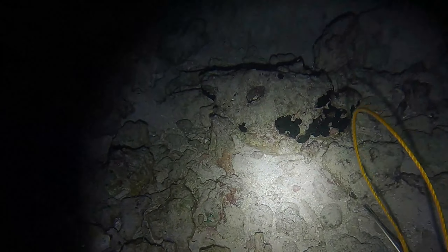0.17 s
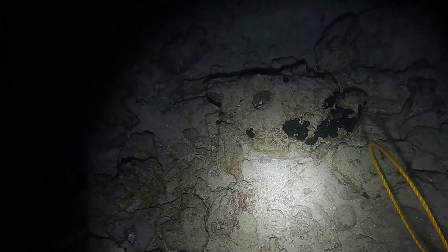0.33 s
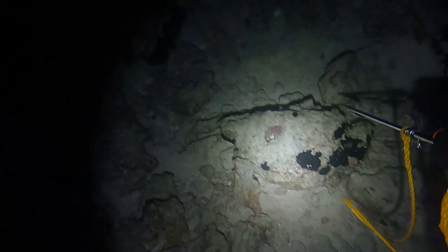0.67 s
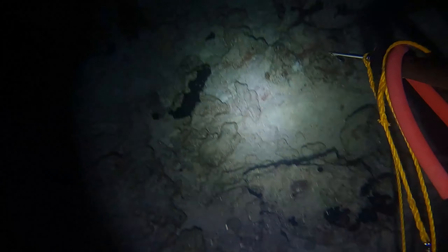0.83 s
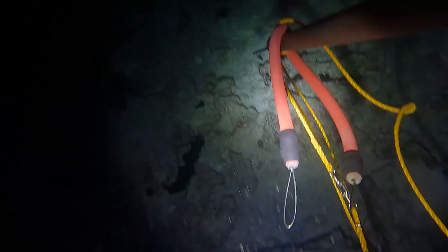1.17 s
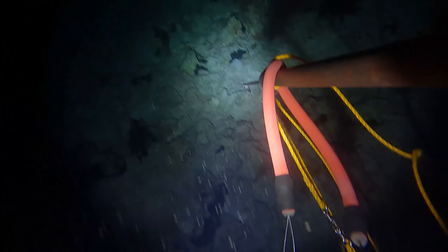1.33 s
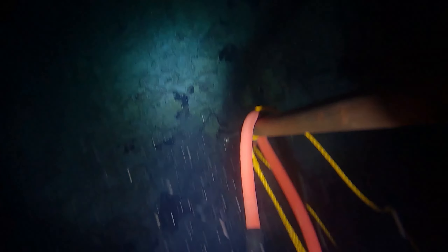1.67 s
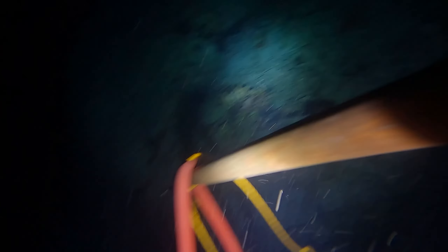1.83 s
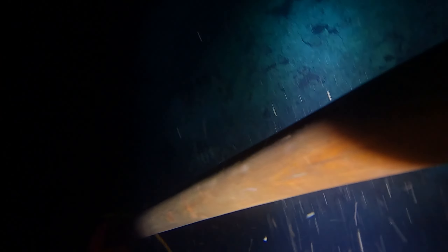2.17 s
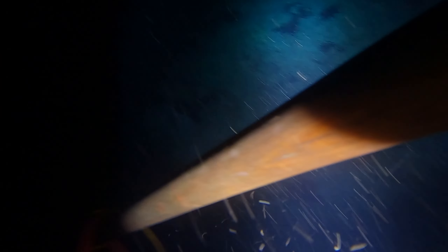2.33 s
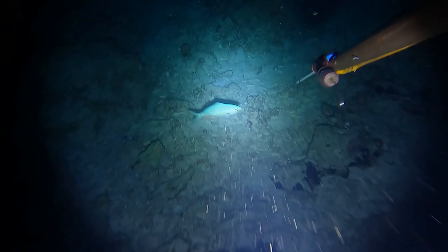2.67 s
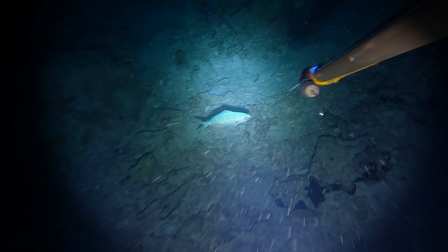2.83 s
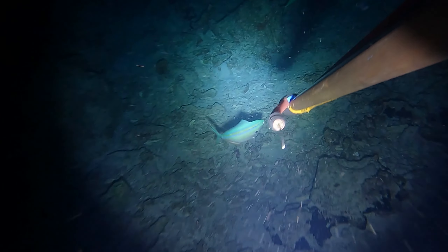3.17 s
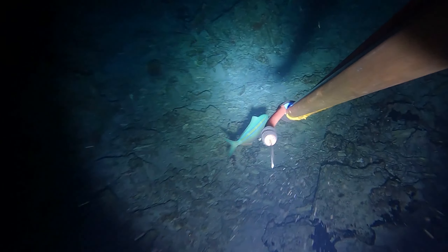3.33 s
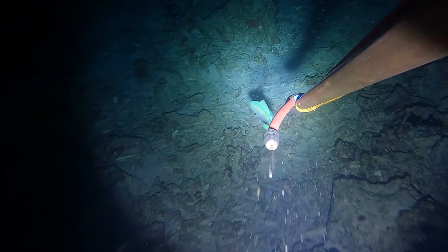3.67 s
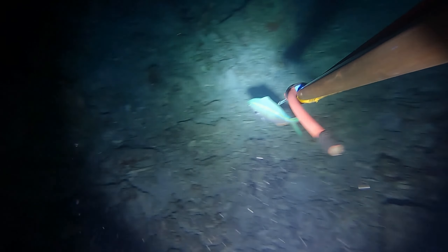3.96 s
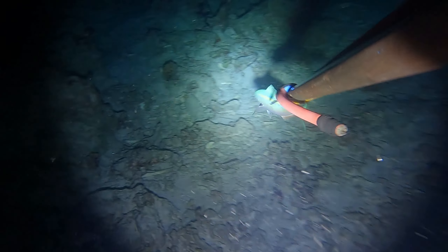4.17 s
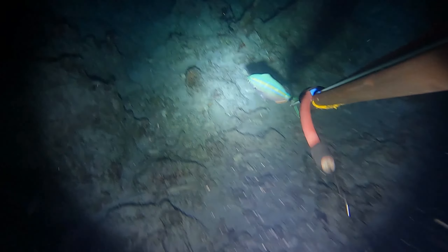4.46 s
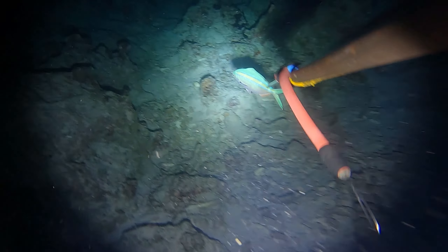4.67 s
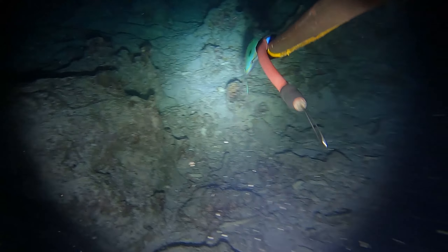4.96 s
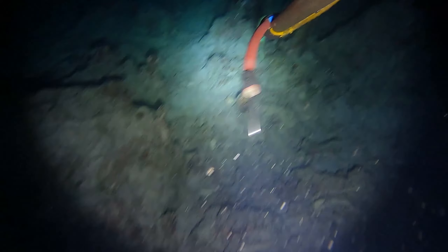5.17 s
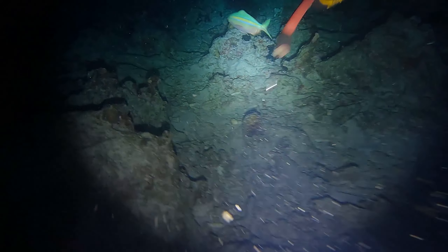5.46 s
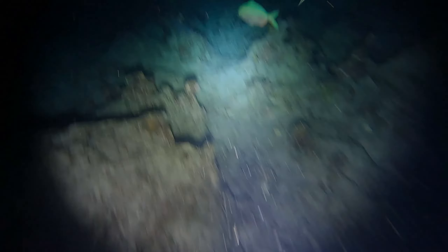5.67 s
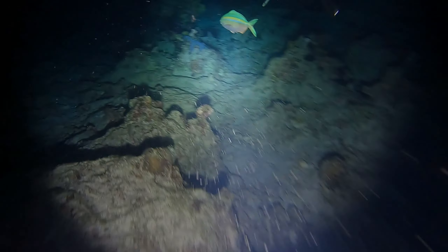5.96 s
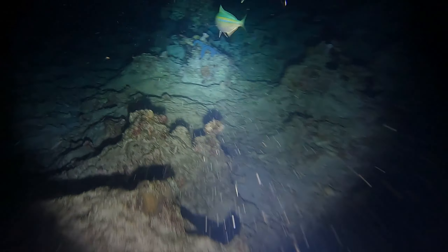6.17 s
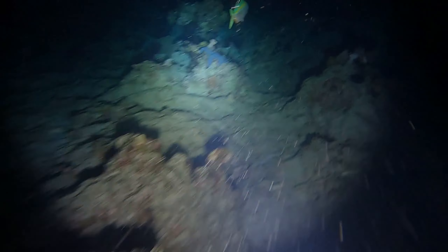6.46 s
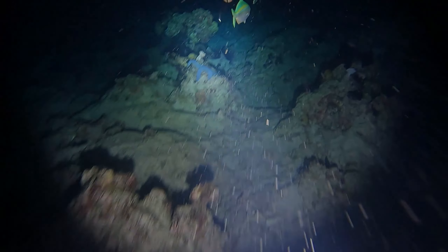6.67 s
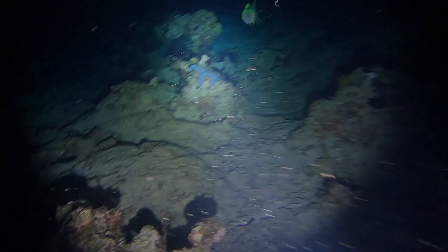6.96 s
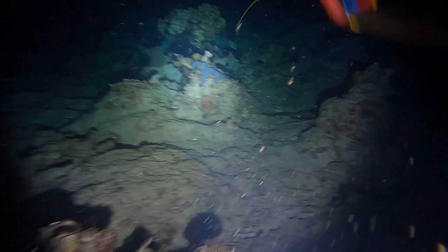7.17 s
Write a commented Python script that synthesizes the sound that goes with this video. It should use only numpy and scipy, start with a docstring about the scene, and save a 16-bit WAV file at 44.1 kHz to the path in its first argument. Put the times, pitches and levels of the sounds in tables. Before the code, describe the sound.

Underwater, water buffets a camera casing with low rumble and steady hollow humming. Sharp clicks crackle near and far. Line and hand scrape the casing, knocks ring its plastic and wet rubber chirps briefly. After a short cut to silence, a calmer, almost mono hum returns with streaming bubbles and snaps, opening out wider before a loud burst of scrapes and knocks.

```python
"""Night reef, two microphone ports in a spearfisher's camera housing under water: it hums as water streams
past, over filtered-noise hiss, with near and far shrimp snaps (clicks with scatter) and bubbles (short tones).
From 0.3 s speargun, line and hand scrape (stick-slip ticks), thump and knock (ringing modes) on the housing;
wet rubber squeaks (gliding tones) from 1.4 s. At 2.5 s the sound cuts out, then fades back in further along
the reef, nearly mono, with more bubbles; the image widens from 5.25 s, and hard handling comes at 7 s."""
import sys
import numpy as np
from scipy import signal
from scipy.fft import rfft, irfft
from scipy.io import wavfile
from scipy.ndimage import uniform_filter1d, map_coordinates

SR = 44100
rng = np.random.default_rng(int(sys.argv[2]) if len(sys.argv) > 2 else 0)


def dump_mix(stems):
    """Bounce the given channels to the path in sys.argv[1] as a 16-bit WAV at rate SR."""
    frames = np.atleast_2d(stems).T  # one column per channel
    limited = np.clip(frames, -1, 1)  # hard clip at full scale
    pcm = np.round(limited * 32767).astype(np.int16)
    wavfile.write(sys.argv[1], SR, pcm)


N = 321930
TIME = np.arange(N) / SR
TAPS = 4096  # length of the impulse responses, in samples
HZ = np.fft.rfftfreq(TAPS, 1 / SR)
FULL_HZ = np.fft.rfftfreq(N, 1 / SR)
# the sound cuts out, starts to fade back in, and is fully back
CUT_S, FADE_S, FULL_S = 2.492, 2.61, 2.77


def amp(db):
    """Decibels to gain."""
    return 10 ** (np.asarray(db) / 20)


def unit(x):
    """Scales to an rms of one."""
    return x / np.sqrt(np.mean(x ** 2) + 1e-20)


def read(points, hz=HZ):
    """Reads a table along a log-frequency axis."""
    f, value = np.transpose(points)
    return np.interp(np.log(hz + 1), np.log(f + 1), value)


def resonances(modes):
    """Gain of a set of steep-sided resonances; each width is taken at half the peak gain."""
    power = 0
    for hz, width_hz, db in modes:
        peak = amp(db) / (1 + ((HZ - hz) / (width_hz * 0.5)) ** 2)
        power = power + peak ** 2
    return np.sqrt(power)


def tilt(slope_db):
    """Gain that leans by so many dB an octave above 600 Hz and is level below."""
    return amp(slope_db * np.log2(np.maximum(HZ, 600) / 1000))


def favour(spot_hz, lift_db=5.5, octaves=0.19):
    """Gain that lifts the range round one favoured frequency."""
    return amp(lift_db * np.exp(-(np.log2((HZ + 1) / spot_hz) / octaves) ** 2))


def hardness(spot_hz, even_hz, slope_db=5.0):
    """The higher the range that a hit favours, the brighter it is, in dB an octave."""
    return slope_db * np.log2(spot_hz / even_hz)


def ring(gain):
    """Causal (minimum-phase) impulse response with the shape of this gain."""
    log_gain = np.log(np.maximum(gain / gain.max(), 1e-5))
    circle = np.concatenate([log_gain, log_gain[-2:0:-1]])
    return np.fft.ifft(np.exp(np.conj(signal.hilbert(circle)))).real


def add(mix, s, sound):
    """Mixes a sound in at time s."""
    part = mix[max(round(s * SR), 0):][:len(sound)]
    part += sound[:len(part)]


def wander(rate_hz, size=N):
    """Smooth random drift through rate_hz random knots a second."""
    knots = rng.standard_normal(N // 8)
    return map_coordinates(knots, [np.arange(size) * rate_hz / SR], order=2, mode="wrap")


# how far the water differs between the two ports: pitch_hz, side_over_middle_db
WATER_WIDTH = [(200, -34), (700, -10), (1500, -5), (4400, -0.5), (8000, -18), (14000, 7)]


def noise(gain):
    """Coloured noise from the water, shared by both ports to a degree that varies with pitch."""
    mid, apart = rfft(rng.standard_normal((2, N)))
    side = apart * amp(read(WATER_WIDTH, FULL_HZ))
    both = np.array([mid + side, mid - side])
    return unit(irfft(both * np.interp(FULL_HZ, HZ, gain), N))


# narrow resonances of the housing's pane: pitch_hz, width_hz, level_db over the direct sound
PANE_MODES = [(1564, 61, 6), (2502, 110, 5), (2752, 146, 10.5), (3370, 220, 4), (3744, 220, 6)]


def through_pane(points):
    """Gain of a sound from the water once the pane of the housing has coloured it."""
    return amp(read(points)) * np.hypot(1, resonances(PANE_MODES))


# strength of the flow round the housing as the diver swims: time_s, strength_db
FLOW_STRENGTH = [(0, -35), (0.65, -34), (1.15, -22), (2.3, -30), (2.9, -28.5), (3.6, -41), (5.7, -31.5),
                 (7.0, -35.5)]
# colour of the buffeting flow, then of the shaking mount: pitch_hz, density_db (per Hz)
BUFFET_COLOUR = [(8, -20.5), (22, -4.5), (90, -22.5), (600, -95.5)]
SHAKE_COLOUR = [(40, -29.5), (80, 6), (100, -5.5), (125, -16), (200, -30.5), (1500, -100)]
# hollow resonances of the housing: pitch_hz, width_hz, before_break_db, after_break_db
HUM_MODES = [(189, 830, -7.5, -11.5), (332, 121, -4, -4.5), (455, 90, -5, -1.5), (504.2, 49.5, 0, 2),
             (701.7, 86, 4, 2), (1130, 68, -14, -48)]
# colour of the hiss in the water before and after the break: pitch_hz, density_db (per Hz)
HISS_BEFORE = [(500, 8.5), (1100, 14), (2000, 3), (4400, -9), (5600, 7.5), (6300, -6.5), (7100, 7),
               (8300, -5.5), (10000, -9), (15500, -31)]
HISS_AFTER = [(1100, -4), (3000, 0), (4500, -5), (4900, 9), (5800, -7), (7200, -3.5), (10200, -11),
              (15500, -23)]


def water(still_s=4.82, still_length_s=0.5, still_db=-34, surge_db=7, settle_s=0.77):
    """Flow buffets the camera, shakes its mount and sets the hollow housing humming, over a thin hiss."""
    before = TIME < CUT_S
    flow_db = np.interp(TIME, *np.transpose(FLOW_STRENGTH))
    buffet = amp(flow_db + 3.0) * noise(amp(read(BUFFET_COLOUR)))

    # the mount shakes more in stronger flow, and holds still for one short spell
    still = np.exp(-((TIME - still_s) / (still_length_s / 2)) ** 4)
    shake_db = np.where(before, -24.5, -16) + 0.44 * flow_db + still_db * still
    shake = amp(shake_db + 2.56 * wander(14)) * noise(amp(read(SHAKE_COLOUR)))

    # the hum starts strong on either side of the break and settles
    elapsed = np.where(before, TIME, np.maximum(TIME - FULL_S, 0))
    hum_db = np.where(before, -41, -34) + surge_db * np.exp(-elapsed / settle_s)
    hum_before = noise(resonances([(hz, width, db) for hz, width, db, _ in HUM_MODES]))
    hum_after = noise(resonances([(hz, width, db) for hz, width, _, db in HUM_MODES]))
    hum = amp(hum_db + 1.66 * wander(25)) * np.where(before, hum_before, hum_after)

    # the hiss flutters, and eases towards the end
    hiss_before = amp(-49.5) * noise(through_pane(HISS_BEFORE))
    hiss_after = amp(-55) * noise(through_pane(HISS_AFTER))
    easing_db = -.9 * np.maximum(TIME - 4.3, 0)
    hiss = np.where(before, hiss_before, hiss_after) * amp(easing_db + 2 * wander(140))
    return buffet + shake + hum + hiss


# the nearest shrimp snaps: start_s, level_db (relative), favoured_hz
NEAR_SNAPS = [(0.036, -27, 2240), (0.078, -24, 5500), (0.119, -29.5, 8500), (0.238, -27, 1480),
              (0.923, -31, 2430), (1.1404, -29, 7450), (1.7384, -24, 3560), (2.961, -30.5, 3000),
              (3.818, -26.5, 1900), (4.241, -32, 2000), (4.4912, -33, 3350), (5.048, -30, 1900),
              (5.2418, -27.5, 2370), (6.427, -30.5, 4640), (6.479, -33.5, 3200), (7.212, -30, 4000)]
# colour of a snap: pitch_hz, density_db (per Hz)
SNAP_COLOUR = [(300, -31), (1100, 9), (7200, 0), (9000, -12.5), (15500, -26.5)]


def shrimp(per_s=70, crowd_db=-46, spread_db=3.5, near_db=-0.5, tail_db=-14, tail_s=0.0061):
    """Cavitation snaps with a short scatter off the reef: a few near ones in a far crackle."""
    t = np.arange(TAPS // 4) / SR
    tails = np.exp(-t / tail_s) * rng.standard_normal((len(NEAR_SNAPS), len(t)))
    scatter = amp(tail_db) * tails + (t == 0)
    close = np.zeros(N)
    for (s, db, spot_hz), echo in zip(NEAR_SNAPS, scatter):
        lean = tilt(hardness(spot_hz, even_hz=4380))
        snap = signal.fftconvolve(echo, ring(through_pane(SNAP_COLOUR) * lean * favour(spot_hz)))
        add(close, s, amp(db + near_db) * snap / abs(snap).max())

    # far snaps come at random times, sizes and sides, each by one of six scatter paths
    happens = rng.random(N) < per_s / SR
    sizes = amp(spread_db * np.minimum(rng.exponential(1, N), 3)) * happens
    side = rng.uniform(.25, .75, N)
    panned = np.sqrt([side, 1 - side]) * sizes
    path = rng.integers(0, 6, N)
    crowd = np.zeros((2, N))
    for k, echo in enumerate(scatter[:6]):
        crowd += signal.oaconvolve(panned * (path == k), echo[None])[:, :N]
    snap = ring(through_pane(SNAP_COLOUR))
    return close + amp(crowd_db) * signal.oaconvolve(crowd, snap[None] / abs(snap).max())[:, :N]


# the nearest bubbles: start_s, level_db, pitch_hz (at the start)
NEAR_BUBBLES = [(0.163, -27, 1180), (0.851, -22, 327), (2.908, -32, 1000), (3.157, -26.5, 1030),
                (4.819, -31, 1070)]


def bubbles(per_s=22, crowd_db=-41, spread_db=4, decay_cycles=1.44, rise_per_s=8):
    """Small bubbles ring for a few cycles and rise in pitch; more stream past after the break."""
    out, t = np.zeros(N), np.arange(TAPS) / SR
    when, size, pitch, keep = rng.random((400, 4)).T
    start_s = when * N / SR
    level_db = crowd_db + spread_db * (2 * size - 1)
    crowd = np.column_stack([start_s, level_db, 550 + 750 * pitch ** 2])
    heard = (start_s > CUT_S) & (keep < per_s * N / SR / len(keep))
    for s, db, hz in [*NEAR_BUBBLES, *crowd[heard]]:
        tone = np.sin(2 * np.pi * hz * t * (1 + rise_per_s / 2 * t))
        add(out, s, amp(db) * np.exp(-t * hz / decay_cycles) * tone)
    return out


# wall modes of the housing, rung by scrapes and knocks: pitch_hz, width_hz, level_db
WALL_MODES = [(453, 70, -2), (701, 145, 4), (948, 86, 2), (1150, 204, 4.5), (1300, 160, 1.5),
              (1554, 130, 5), (1900, 820, -2), (2510, 300, -4), (2910, 280, -5.5), (3500, 650, -10),
              (5400, 3700, -16.5), (7030, 890, -15.5)]


def wall_ring(bright_db, spot_hz, broad_db):
    """Each touch lands on another spot and favours other wall modes; a broad response fills the valleys."""
    broad = amp(broad_db) / (1 + (HZ / 3200) ** 2)
    return ring(np.hypot(resonances(WALL_MODES), broad) * tilt(bright_db) * favour(spot_hz))


# dull response of the housing when pressed hard: pitch_hz, density_db (per Hz)
BODY_COLOUR = [(50, -15), (130, -2.5), (400, -6), (500, -3), (620, -30), (1200, -47.5), (4000, -93.5)]
# scrapes: start_s, length_s, wall_db, body_db, brightness_db (per octave), favoured_hz,
# swell_db (from start to end), rocking_db (of the mount)
SCRAPE_STROKES = [ (0.28, 0.042, -28.5, -27.5, -1, 1930, -5, -10.5),
                  (0.323, 0.06, -33.5, -37.5, -2, 715, 0, -22),
                  (0.394, 0.018, -23, -30.5, -1.5, 1130, -8, -20.5),
                  (0.418, 0.0555, -25.5, -26, -3.5, 700, -10, -21.5),
                  (0.468, 0.052, -29.5, -33.5, -4, 1150, 0, -40.5),
                  (0.962, 0.17, -41, -32, -26, 474, -4, -28),
                  (1.418, 0.044, -25.5, -31.5, -0.5, 2820, 6.5, -7),
                  (1.456, 0.07, -33, -34.5, -1, 2800, 0, -10),
                  (1.914, 0.04, -20, -21.5, -3.5, 620, 9.5, -9),
                  (2.001, 0.058, -25.5, -27.5, -9, 1290, 2, -9.5),
                  (2.347, 0.08, -34, -42.5, -1, 1160, -1, -29), (2.46, 0.06, -39, -32.5, -1, 1120, 4, -7.5),
                  (6.972, 0.03, -30.5, -17, -2, 2150, 7, -9),
                  (6.997, 0.027, -14, -5.5, -0.5, 1780, -5, 0.5),
                  (7.023, 0.066, -7.5, -1.5, -4, 1270, 8, 2), (7.086, 0.025, -8, -13, -5, 1130, -1, -3),
                  (7.104, 0.04, -29, -17, -2, 2900, -15, -20),
                  (7.207, 0.048, -25.5, -25.5, -20, 687, -5, -11)]
# a stroke builds up, swells or fades while it lasts, and lets go
PRESS_S, LET_GO_S = 0.006, 0.01335


def scrapes(slips_per_s=800, spread_db=3.0, grit=0.64, clump_db=2):
    """Dense stick-slip ticks come in clumps and ring the wall; pressure also drives the dull body."""
    out, body = np.zeros(N), ring(amp(read(BODY_COLOUR)))
    happens = rng.random(N) < slips_per_s / SR
    sizes = amp(spread_db * np.minimum(rng.exponential(1, N), 3))
    slips = rng.standard_normal(N) * sizes * happens
    friction = (unit(slips) + grit * rng.standard_normal(N)) * amp(clump_db * wander(220))
    for s, length, wall_db, body_db, bright_db, spot_hz, swell_db, _ in SCRAPE_STROKES:
        size = round(length * SR)
        stroke = friction[round(s * SR):][:round((length + LET_GO_S / 2) * SR)]
        t = np.arange(len(stroke)) / SR
        press = np.clip(t / PRESS_S, 0, 1)
        let_go = np.clip(.5 + (length - t) / LET_GO_S, 0, 1) ** 2
        stroke = stroke * press * amp(swell_db * t / length) * let_go
        wall = wall_ring(bright_db, spot_hz, broad_db=-15.0)
        for db, response in (wall_db, wall), (body_db, body):
            sound = signal.fftconvolve(stroke, response)
            add(out, s, amp(db) * sound * np.sqrt(size / np.sum(sound ** 2)))
    return out


# the mount rings low while it is pressed, higher once it is free: pitch_hz, level_db (relative), t60_s
PRESSED_MODES = [(56.4, 0, 0.22), (270.6, -22, 0.26)]
FREE_MODES = [(82, 0, 0.22), (186, -18, 0.5)]
# knocks of gear on the housing: start_s, level_db, favoured_hz, body_push_db (over the wall)
GEAR_KNOCKS = [(0.295, -16.5, 3450, -7), (0.3974, -17.5, 3500, 0), (0.4277, -13.5, 1900, -8),
               (0.436, -13.5, 3550, -3), (0.507, -18.5, 3600, -8.5), (0.6052, -15, 1220, -24),
               (2.047, -14, 2700, -3), (2.108, -14, 1120, -13.5), (1.534, 2.5, 1800, -10),
               (1.9401, -9.5, 1500, -13), (1.946, -14.5, 2700, -6.5), (2.029, -14, 1290, -19.5),
               (3.205, -19.5, 1246, -6), (7.006, -9, 2390, -5), (7.048, 4.5, 1294, -4), (7.07, 0, 476, -1),
               (7.095, -7, 2810, 11)]


def blows(rise_s=0.0062, chatter_db=-23, chatter_s=0.003, brightens=1.0):
    """Scrapes thump the mount on taking hold and letting go; knocks chatter, ring the wall, push the body."""
    out, t = np.zeros(N), np.arange(SR // 2) / SR
    for s, length, *_, swell_db, rock_db in SCRAPE_STROKES:
        # a stroke that swells lets go harder than it took hold
        hold = s + PRESS_S, rock_db - swell_db / 2, PRESSED_MODES
        release = s + length - LET_GO_S, rock_db + swell_db / 2, FREE_MODES
        for at, force_db, modes in (hold, release):
            thump = np.zeros(len(t))
            for k, (hz, db, t60) in enumerate(modes):
                mode_db = db + k * brightens * force_db  # only hard thumps bring out the upper mode
                thump += amp(mode_db - 60 * t / t60) * np.sin(2 * np.pi * hz * t)
            add(out, at, amp(force_db) * (1 - np.exp(-t / rise_s)) * thump)

    body = ring(amp(read(BODY_COLOUR)))
    for s, db, spot_hz, push_db in GEAR_KNOCKS:
        chatter = np.exp(-t / chatter_s) * rng.standard_normal(len(t))
        contact = (t == 0) + amp(chatter_db) * chatter
        response = wall_ring(hardness(spot_hz, even_hz=3000), spot_hz, broad_db=-6.5)
        wall = signal.fftconvolve(contact, response)[:TAPS]
        add(out, s, amp(db) * (wall / abs(wall).max() + amp(push_db) * body / abs(body).max()))
    return out


# rubber slipping: start_s, length_s, first_hz, middle_hz, last_hz, level_db, overtone_db
RUBBER_SLIPS = [(1.424, 0.038, 1320, 1355, 1380, -26, -2), (1.441, 0.06, 680, 712, 700, -28, -18),
                (1.505, 0.021, 5200, 2950, 5200, -28, -10), (1.523, 0.011, 4700, 4100, 2700, -29, -10),
                (1.541, .011, 4750, 5000, 4700, -34, -20), (2.374, 0.024, 6300, 5200, 4300, -31, -25),
                (1.8865, 0.0245, 4500, 3100, 7600, -18, -9), (2.364, 0.038, 4700, 3500, 2400, -28, -15)]


def squeaks(rough=0.042, grit_db=-11, grit_hz=5000):
    """Wet rubber slips in a quick, unsteady glide with weak overtones."""
    out = np.zeros(N)
    for s, length, first_hz, middle_hz, last_hz, db, overtone_db in RUBBER_SLIPS:
        u = np.linspace(0, 1, round(length * SR))
        curve = np.polyfit([0, .5, 1], np.log([first_hz, middle_hz, last_hz]), 2)
        glide = np.exp(np.polyval(curve, u))
        turn = 2 * np.pi * np.cumsum(glide * (1 + rough * wander(900, size=len(u)))) / SR
        tone = np.sin(turn)
        tone += amp(overtone_db) * np.sin(2 * turn) + amp(overtone_db - 20) * np.sin(3 * turn)
        # friction hisses round the tone
        tone += amp(grit_db) * wander(grit_hz, size=len(u)) * np.sin(turn)
        # slow slips are the large ones
        level = amp(db + 2.9 * wander(436, size=len(u))) * middle_hz / glide
        add(out, s, level * signal.windows.tukey(len(u), .3) * tone)
    return out


# how a touch differs from the first port to the second: pitch_hz, difference_db
PORT_BALANCE = [(250, 0.5), (700, 4.5), (1200, 6.5), (2000, -2), (12000, 0)]
# the same in phase: pitch_hz, difference_rad
PORT_PHASE = [(400, -0.061), (2600, -1.1), (4800, -0.74)]


def ports(x):
    """The housing carries a touch to each port with its own gain and phase."""
    lean = amp(read(PORT_BALANCE, FULL_HZ) / 2) * np.exp(.5j * read(PORT_PHASE, FULL_HZ))
    return irfft(rfft(x) * np.array([lean, 1 / lean]), N)


def reflections(x, echo_db, decay_s):
    """Sound bounces inside the housing for a few ms, by other paths to each port; bass bounces little."""
    t = np.arange(TAPS // 4) / SR
    taps = rng.standard_normal((2, len(t))) * np.exp(-t / decay_s)
    taps = taps / np.linalg.norm(taps, axis=1)[:, None]
    taps = signal.sosfilt(signal.butter(2, 700, "high", fs=SR, output="sos"), taps)
    return x + amp(echo_db) * signal.oaconvolve(x, taps, axes=1)[:, :N]


def scene(damping_hz=10500):
    """Sounds of the water and of touches on the housing, whose plastic soaks up the top treble."""
    damping = signal.butter(2, damping_hz, fs=SR, output="sos")
    touches = ports(signal.sosfilt(damping, scrapes() + blows() + squeaks()))
    touches = reflections(touches, echo_db=-11, decay_s=.002)
    return water() + shrimp() + bubbles() + touches


def narrowed(x, narrow_db=-42, opens_s=5.25, opening_s=0.97):
    """The stereo image closes at the break and opens again later."""
    closed = (TIME > CUT_S) * np.clip(1 - (TIME - opens_s) / opening_s, 0, 1)
    mid = x.mean(0)
    return mid + amp(narrow_db * closed) * (x - mid)


def record(dry, limit_db=-11, recovery_db_per_s=18, edge_hz=15600):
    """Gain ducks at loud touches and recovers; sound breaks off and fades back; treble is cut at the edge."""
    power = uniform_filter1d((dry ** 2).mean(0), size=700)
    power_db = 10 * np.log10(abs(power) + 1e-12)
    # hold each peak level and let it fall steadily
    fall = TIME * recovery_db_per_s
    held_db = np.maximum.accumulate(power_db + fall) - fall
    duck_db = uniform_filter1d(np.maximum(held_db - limit_db, 0), size=200)
    fade = (TIME < CUT_S) + np.clip((TIME - FADE_S) / (FULL_S - FADE_S), 0, 1) ** 1.3
    out = np.clip(narrowed(dry) * amp(-duck_db) * fade, -.9, .9)
    band = signal.firwin(511, edge_hz, window=("kaiser", 9), fs=SR)
    return signal.oaconvolve(out, band[None], "same")


dry = scene()
out = record(dry)
dump_mix(out)
```